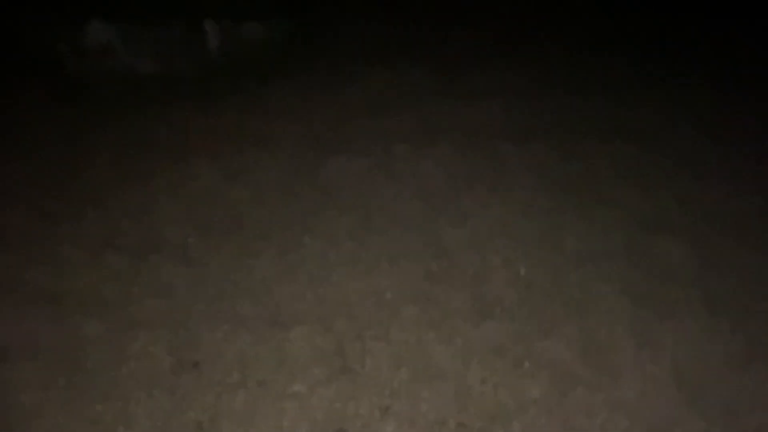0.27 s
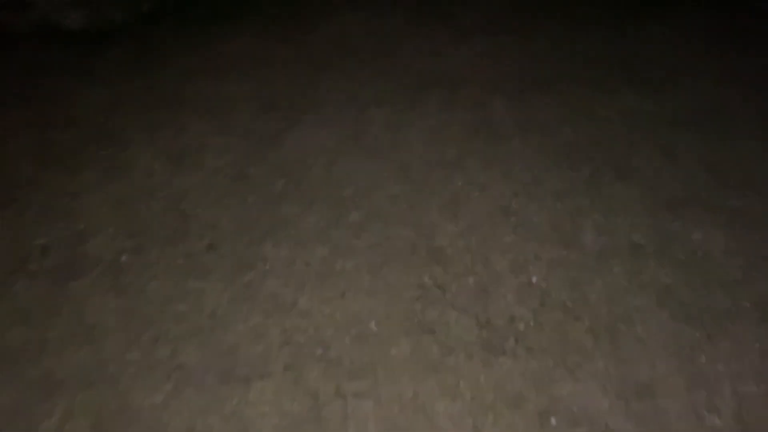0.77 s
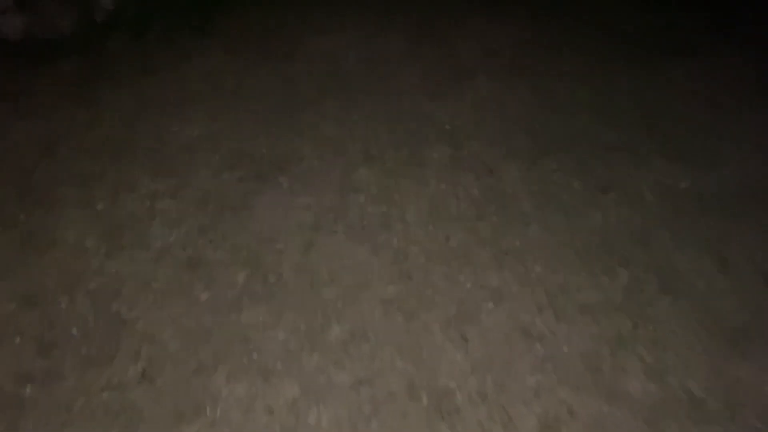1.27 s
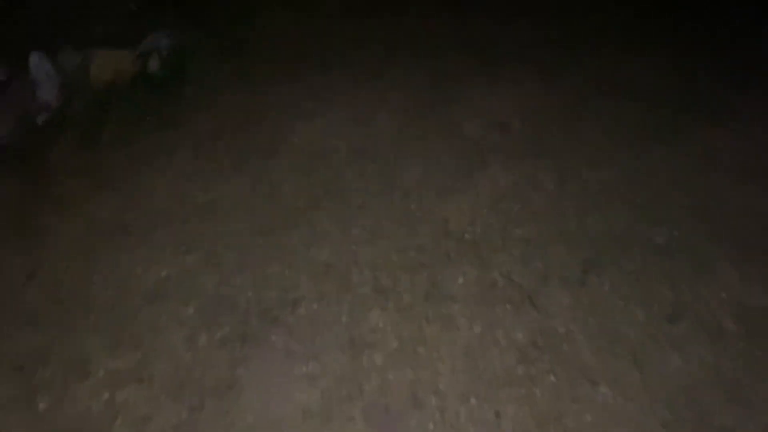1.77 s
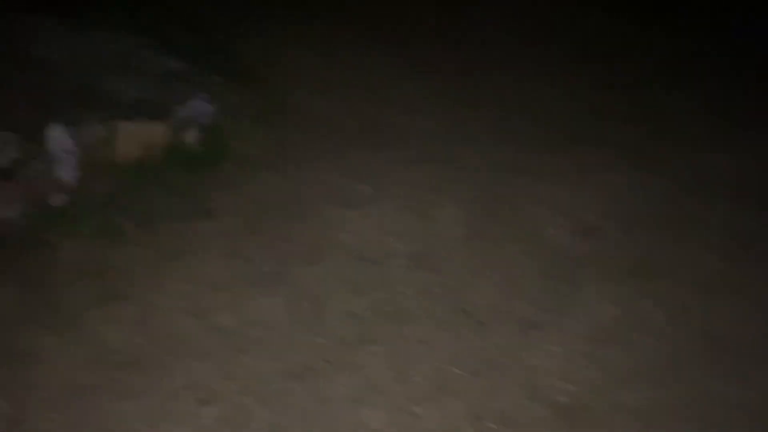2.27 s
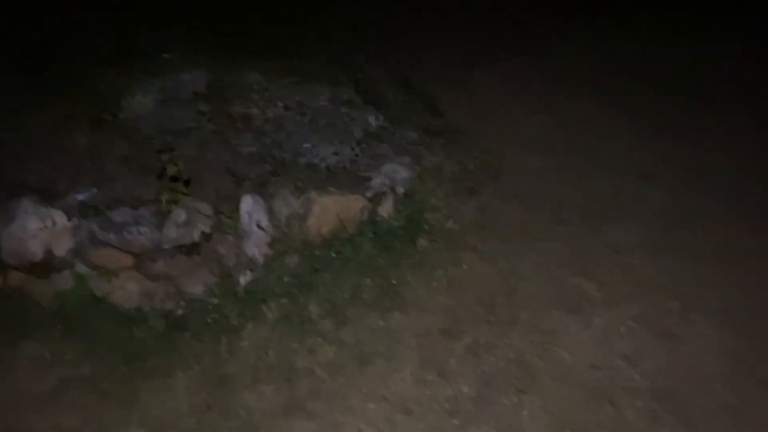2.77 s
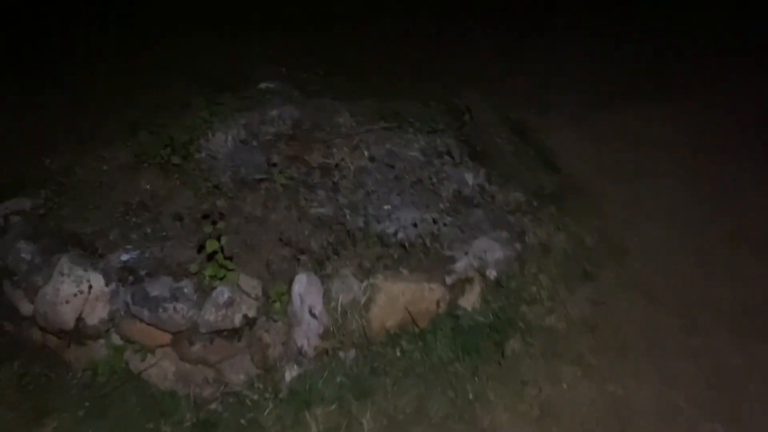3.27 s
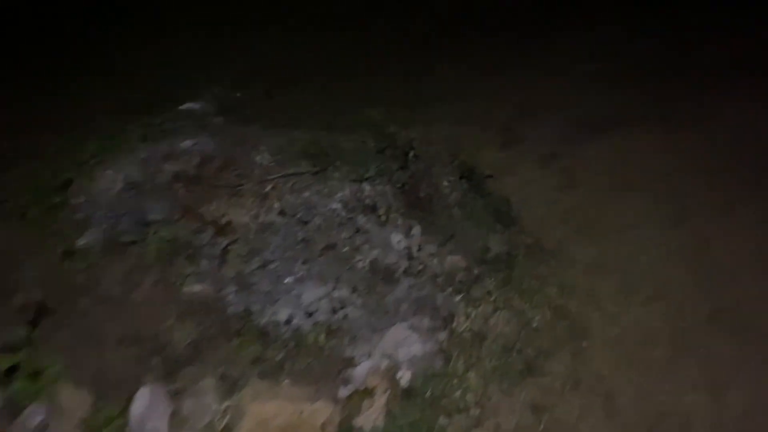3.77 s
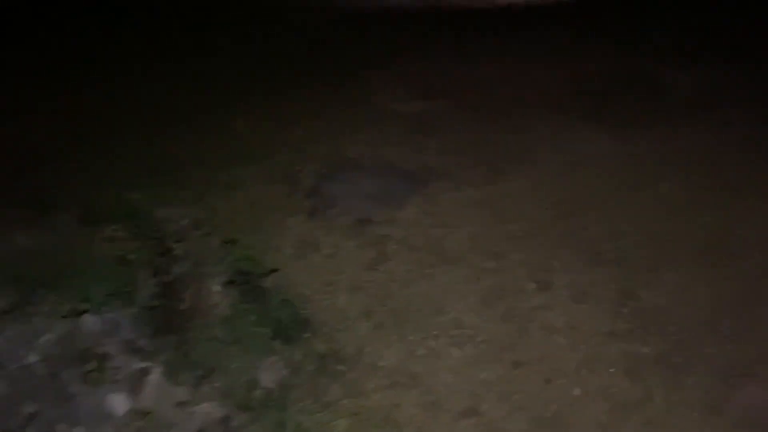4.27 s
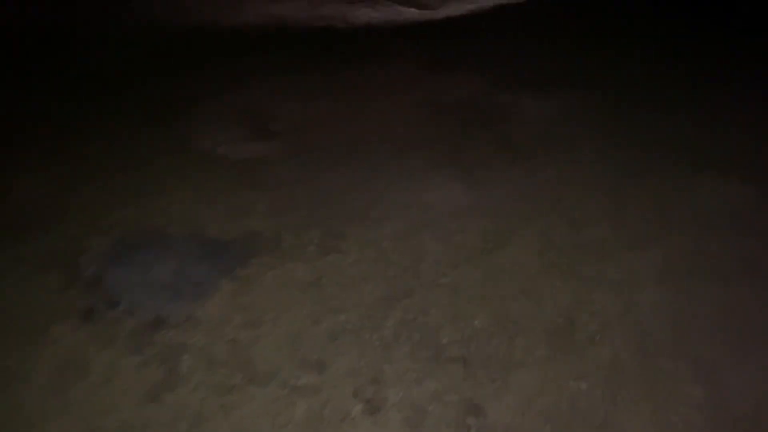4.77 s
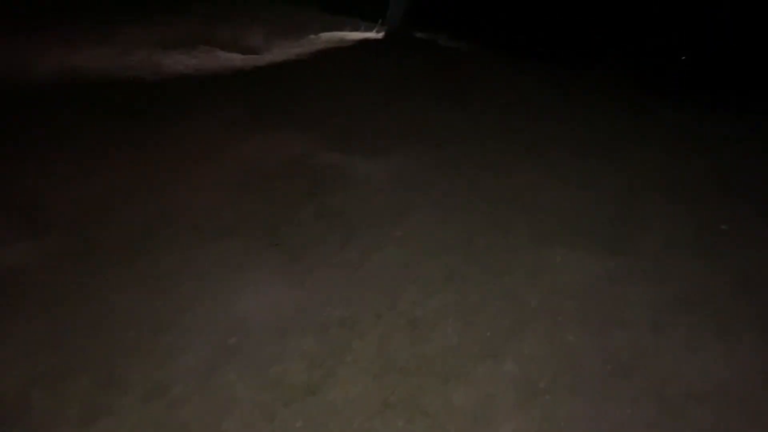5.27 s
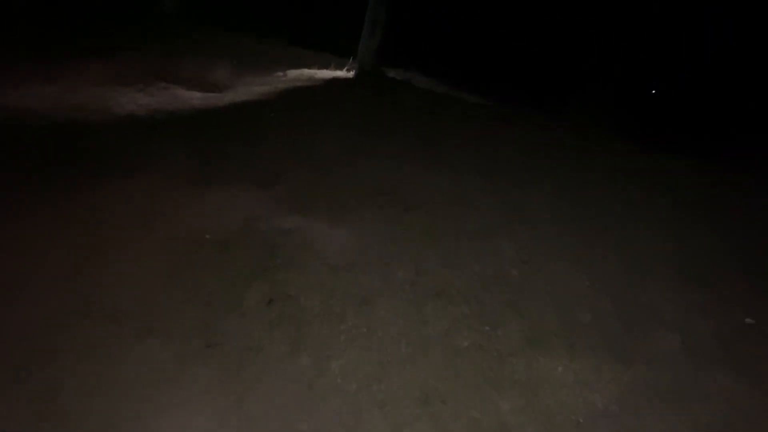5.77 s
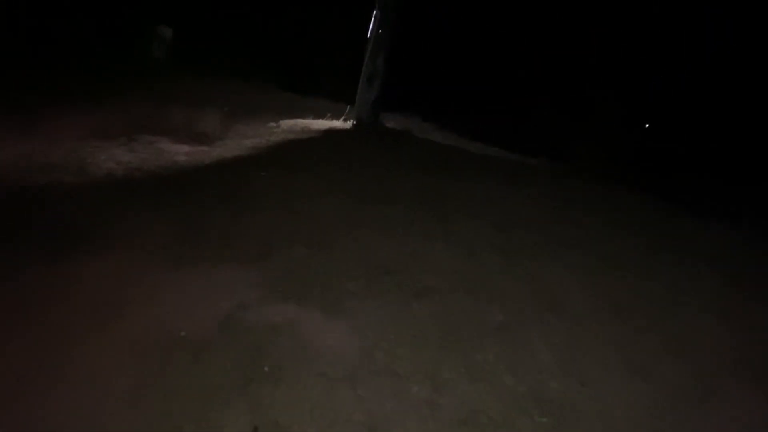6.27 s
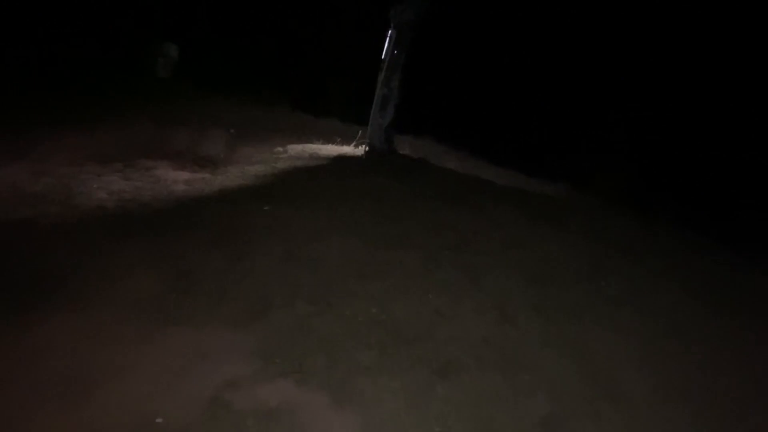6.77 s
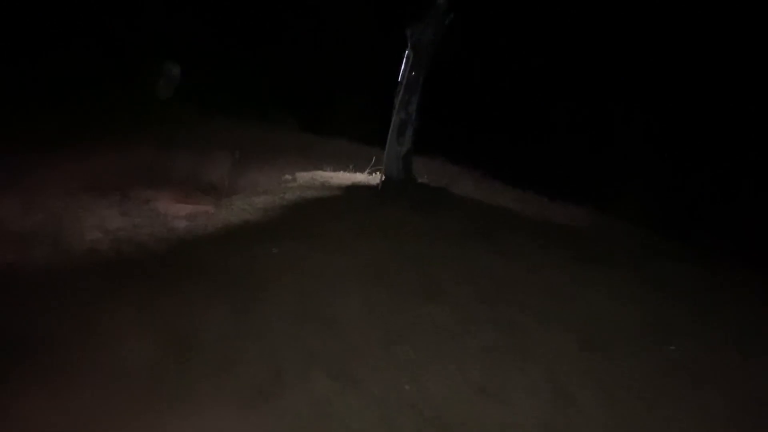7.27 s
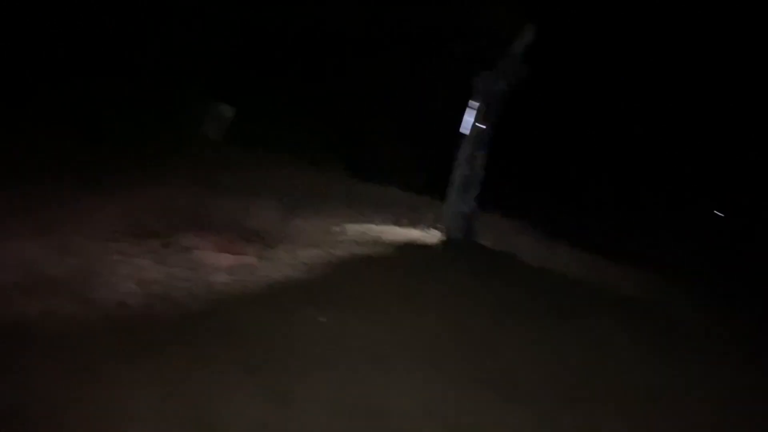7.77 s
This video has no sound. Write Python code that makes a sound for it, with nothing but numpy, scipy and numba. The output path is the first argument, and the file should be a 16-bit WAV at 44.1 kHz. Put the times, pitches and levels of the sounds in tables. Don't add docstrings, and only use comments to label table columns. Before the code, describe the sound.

Handheld stereo microphone on a walker in open night air: unhurried footsteps, roughly two a second, crunch dry grass, drag through soil and softly shake the ground. Twigs tick and pop between steps. A high, raspy katydid pulses constantly, faintest just before the middle and strongest later. A deep thud stands out around five seconds; distant insects make a thin hiss with a faint cricket throb.

```python
import sys
import numpy as np
from scipy import signal
from scipy.fft import rfft, irfft
from scipy.io import wavfile
from scipy.ndimage import uniform_filter1d
from numba import njit

SR = 44100
rng = np.random.default_rng(int(sys.argv[2]) if len(sys.argv) > 2 else 0)


def gain_from_db(level_db):
    decades = np.asarray(level_db, float) / 20
    return 10 ** decades


def output_pcm(signal):
    pcm = np.clip(np.atleast_2d(signal).T, -1, 1) * 32767
    wavfile.write(sys.argv[1], SR, np.round(pcm).astype(np.int16))


N = 353505
TIME = np.arange(N) / SR


def rms_one(x):
    return x / np.sqrt(np.mean(x ** 2) + 1e-20)


def at_hz(points, hz):
    table_hz, table_db = np.transpose(points)
    return np.interp(np.log(hz), np.log(table_hz), table_db)


def drift(rate):
    r = np.exp(-80 * np.pi * rate / SR)
    draws = rng.standard_normal(N // 40 + 2002)
    slow = signal.lfilter([1], [1, -2 * r, r * r], draws)[2000:]
    return np.interp(np.arange(N) / 40, np.arange(len(slow)), rms_one(slow))


def noise_pair():
    return rng.standard_normal((2, N))


def grains(per_s, spread_db):
    spread = spread_db * np.minimum(rng.exponential(1, (2, N)), 5)
    size = gain_from_db(spread) * rng.standard_normal((2, N))
    struck = rng.random(N) < per_s / SR
    return rms_one(size * struck + 1e-9)


# frequency in Hz, left-right likeness from 0 to 1.
PORT_LIKENESS = [(60, .88), (250, .7), (700, .7), (2300, .45), (4000, .5), (6500, .75), (8500, .95),
                 (15000, .97)]


def colour(pair, spectrum, sharing=1):
    hz = np.fft.rfftfreq(N, 1 / SR) + 1
    lowest, highest = spectrum[0][0], spectrum[-1][0]
    skirt = np.clip(hz / lowest, 0, 1) ** 3 * np.clip(highest / hz, 0, 1) ** 3
    alike = np.clip(sharing * at_hz(PORT_LIKENESS, hz), 0, 1)
    mid, side = rfft(pair) * gain_from_db(at_hz(spectrum, hz)) * skirt
    return rms_one(irfft(np.sqrt(1 + alike) * mid + np.sqrt(1 - alike) * side * [[1], [-1]], N))


@njit
def resonate(x, turn, r):
    y = np.zeros(len(x))
    for i in range(2, len(x)):
        drive = (1 - r * r) / 2 * (x[i] - x[i - 2])
        y[i] = drive + 2 * r * np.cos(turn[i]) * y[i - 1] - r * r * y[i - 2]
    return y


def mode(x, hz, width_hz):
    return resonate(x, 2 * np.pi * hz / SR * np.ones(N), np.exp(-np.pi * width_hz / SR))


def double_mode(x, hz, width_hz):
    return mode(mode(x, hz, width_hz), hz, width_hz)


# time in seconds, chirp level in dB,
# facing as a lift of the high wing modes in dB, lateness in ms.
APPROACH = [(0.0, -35, 5, 1), (0.45, -41, 2, 0), (1.25, -40, -2.5, -5), (1.45, -36, -4.5, -5.5),
            (2.0, -34.5, 1, -3), (2.25, -33, 3, -5.5), (2.95, -36.5, -1.5, -0.5), (3.1, -45.5, -7.5, -1),
            (3.7, -47, -3.5, -0.5), (3.9, -40.5, -4.5, 2), (4.15, -37.5, -4.5, 0), (4.45, -33.5, 1.5, 5.5),
            (5.0, -32, 4, 7.5), (5.702, -30, 0, 5), (6.55, -28, 0.5, 5), (6.95, -30, -1, 3.5),
            (7.7, -29, 4, 4), (8.0, -32, 0, -1)]
# time in ms, level in dB, gap in ms, second stroke in dB, facing in dB.
CHIRP_CHANCE = (1.2, .25, 1.0, .8, 1.0)
FIRST_CHIRP_S, CHIRP_EVERY_S, CHIRP_COUNT = 0.0795, 0.11948, 67


def chirps():
    beat_s = FIRST_CHIRP_S + CHIRP_EVERY_S * np.arange(CHIRP_COUNT)
    at_s, *place = np.transpose(APPROACH)
    level_db, facing_db, late_ms = [np.interp(beat_s, at_s, column) for column in place]
    gap_ms = 17.8 - 0.14 * (level_db + 39)
    second_db = 1 + 0.42 * facing_db
    rows = np.transpose([late_ms, level_db, gap_ms, second_db, facing_db])
    rows = rows + CHIRP_CHANCE * rng.standard_normal((CHIRP_COUNT, 5))
    return np.column_stack([beat_s + rows[:, 0] / 1000, rows[:, 1:]])


# time from the top in ms, tooth force in dB, wing pitch in Hz.
FIRST_STROKE = [
    (-37, -65, 6900),
    (-30.5, -18, 5800),
    (-38, -17, 4800),
    (-21, -26.5, 5900),
    (-15, -9, 6280),
    (-6, -3, 6744),
    (1.5, -4, 6700),
    (3.5, -10.5, 13000),
    (9, -8.5, 3600),
]
SECOND_STROKE = [
    (-9, -27, 6300),
    (-2.5, -3, 6900),
    (1.5, -0.5, 7675),
    (2.5, -5.5, 7900),
    (2, -28, 7700),
    (15, -33, 22000),
]
# share of the wing pitch, width in Hz, level in dB,
# extra dB per dB of nearness.
BENDING_MODES = [(1.0, 450, 2.5, 0.05), (1.12, 800, -5, .1), (1.27, 1000, -14, -.3), (.7, 700, -19, .4),
                 (.84, 800, -14, .3)]
# frequency in Hz, width in Hz, level in dB, extra dB per dB of nearness.
STAYING_MODES = [(7605, 700, -8.5, 1.43), (10940, 1800, -16.5, -.5), (12600, 2150, -17, -0.5),
                 (15300, 2200, -16, -.5)]
# frequency in Hz, width in Hz, level in dB, extra dB per dB of nearness.
WING_MIRROR = (8098, 600, -7.5, .5)
TEETH_PER_S = 5000
EVENNESS = 0.9


def katydid(song_rows, echo_db):
    force, pitch = np.zeros(N), np.full(N, 5800.)
    high_db, near_db = np.zeros(N), np.zeros(N)
    for s, level_db, gap_ms, second_db, facing_db in song_rows:
        first = (FIRST_STROKE, s, level_db)
        second = (SECOND_STROKE, s + gap_ms / 1000, level_db + second_db)
        for stroke, top_s, db in (first, second):
            ms, force_db, hz = np.transpose(stroke)
            span = slice(max(round((top_s + ms[0] / 1000) * SR), 0), round((top_s + ms[-1] / 1000) * SR))
            now_ms = (TIME[span] - top_s) * 1000
            force[span] = np.maximum(force[span], gain_from_db(db + np.interp(now_ms, ms, force_db)))
            pitch[span] = np.interp(now_ms, ms, hz)
            high_db[span] = 0.5 * facing_db
            near_db[span] = level_db + 37.5
    force = uniform_filter1d(force, size=60)
    pitch = uniform_filter1d(pitch, size=200)

    modes = []
    for share, width, db, slope in BENDING_MODES:
        modes.append((share * pitch, width, db + np.sign(share - 1.07) * high_db, slope))
    for hz, width, db, slope in STAYING_MODES:
        beaming_db = 0.81 * (hz > 9000) * high_db
        modes.append((hz, width, db + beaming_db, slope))
    song = np.zeros(N)
    for hz, width, db, slope in modes:
        teeth = grains(TEETH_PER_S, spread_db=-1.14)[0]
        ringing = double_mode(teeth, hz, width)
        swing = uniform_filter1d(ringing ** 2, size=400) / np.mean(ringing ** 2) + 0.15
        song += ringing * swing ** (-EVENNESS / 2) * force * gain_from_db(db + slope * near_db + 16.0)

    hz, width, db, slope = WING_MIRROR
    touch = np.abs(force / gain_from_db(near_db - 30.5)) ** 0.28
    touch = touch * gain_from_db(db + (1 + slope) * near_db + high_db - 24.0)
    song += double_mode(grains(TEETH_PER_S, spread_db=-2.0)[0], hz, width) * touch

    leaves = rng.standard_normal((2, 4, SR // 4)) * gain_from_db(-60 * TIME[:SR // 4] / 0.13)
    leaves = leaves / np.sqrt(np.sum(leaves[0, 0] ** 2))
    place = np.searchsorted(song_rows[:, 0] + 0.05, TIME) % 4
    parts = song * (place == np.arange(4)[:, None])
    echoes = signal.oaconvolve(parts[None], leaves, axes=2).sum(axis=1)[:, :N]
    mid, side = echoes * gain_from_db(echo_db)
    return song * gain_from_db([[1.1], [-1.1]]) + mid + 0.2 * side * [[1], [-1]]


def swells(events, shapes):
    powers = np.zeros((3, N))
    for s, *levels in events:
        span = slice(max(round((s - 0.5) * SR), 0), round((s + 1) * SR))
        for power, db, (delay_s, rise_s, fall_s) in zip(powers, levels, shapes):
            t = TIME[span] - s - delay_s
            envelope = np.exp(2 * np.minimum(t / max(rise_s, 0.005), -t / max(fall_s, 0.005)))
            power[span] += gain_from_db(2 * db) * envelope
    return powers


# time in seconds, grass crunch in dB, soil scuff in dB, ground rumble in dB.
STEPS = [(0.23, -44, -51, -47.5), (0.8, -46, -54.5, -62), (0.96, -45, -49, -50.5), (1.365, -44, -53, -50),
         (1.94, -47, -60, -48.5), (2.49, -49.5, -51.5, -51), (2.94, -53.5, -71, -56),
         (3.73, -39.5, -48.5, -45), (4.29, -52.5, -56, -50), (4.85, -45, -52.5, -43),
         (5.4, -46.5, -46, -46), (5.93, -45.5, -52.5, -47.5), (6.47, -50, -53, -55),
         (7.11, -48.5, -61.5, -46), (7.73, -45.5, -49.5, -43.5)]
# time in seconds, grass crunch, soil scuff and ground rumble in dB.
DRAGS = [(0.5, -55, -50.5, -58), (0.68, -46, -53.5, -71), (1.06, -73, -47.5, -60), (1.6, -64, -49, -49),
         (1.83, -46.5, -71, -76), (2.22, -54, -46, -56), (2.72, -66, -48.5, -51), (3.1, -49, -63, -52),
         (3.29, -52, -48, -48), (3.44, -53, -45.5, -42), (3.58, -53, -60, -67), (4.01, -69, -52.5, -56),
         (4.15, -52, -52, -46), (4.4, -51.5, -50, -57), (4.55, -72, -49.5, -49), (5.0, -53, -51, -48),
         (5.11, -53, -53, -59), (5.24, -52, -51.5, -50), (5.53, -52.5, -59, -60), (5.66, -72, -69, -46),
         (6.1, -79, -51.5, -50), (6.28, -81, -55, -52), (6.7, -51.5, -48, -50), (6.83, -69, -52.5, -71),
         (7.29, -66, -46.5, -54), (7.5, -70, -56.5, -52.5), (7.93, -74, -74, -54)]
# delay, rise and fall in seconds.
STEP_SHAPE = [(0, 0.025, 0.096), (.0, 0.027, 0.24), (0.069, 0.1, 0.17)]
# delay, rise and fall in seconds.
DRAG_SHAPE = [(0, 0.05, 0.037), (0, 0.087, 0.054), (0, .07, .06)]
# crunch, scuff and rumble in dB.
BETWEEN_STEPS_DB = (-63, -64, -56)
# frequency in Hz, level in dB per Hz.
CRUNCH_TONE = [(700, -3), (1200, 4.5), (2000, 5), (3200, -1), (5000, -5.5), (9000, -32.5), (15000, -14)]
# frequency in Hz, level in dB per Hz.
SCUFF_TONE = [(150, 2), (300, 2), (650, 0.5), (1000, -3), (1600, -14)]
# frequency in Hz, level in dB per Hz.
RUMBLE_TONE = [(15, -42), (25, -6), (43, -10), (59, 0), (129, -8.5), (250, -21), (320, -45), (550, -120)]


def walking():
    power = swells(STEPS, STEP_SHAPE) + swells(DRAGS, DRAG_SHAPE)
    power = power + gain_from_db(2 * np.array(BETWEEN_STEPS_DB))[:, None]
    crunch_gain, scuff_gain, rumble_gain = np.sqrt(power)
    rumble_clumps, scuff_clumps, crunch_clumps = [gain_from_db(1.2 * drift(rate)) for rate in (10, 25, 30)]
    rumble = rumble_gain * rumble_clumps * colour(noise_pair(), RUMBLE_TONE)
    scuff = scuff_gain * scuff_clumps * colour(grains(1500, spread_db=2.0), SCUFF_TONE)
    crunch = crunch_gain * crunch_clumps * colour(grains(2000, spread_db=0.5), CRUNCH_TONE)
    return rumble + scuff + crunch


# time in seconds, peak in dB.
STEM_SNAPS = [(0.192, -33), (0.9797, -56), (1.3557, -42), (1.3604, -34), (1.9473, -41), (2.0146, -35),
              (2.0298, -41), (2.4722, -35), (3.7377, -56), (4.242, -36), (5.403, -34.5), (5.936, -36),
              (7.7404, -36)]


def snaps():
    clicks = np.zeros(N)
    for s, db in STEM_SNAPS:
        clicks[round(s * SR)] = gain_from_db(db + 16)
    return mode(clicks, 3400, 3700) + gain_from_db(7.5) * mode(clicks, 1500, 1800)


def glide(s, peak_db, hz, rise_s, fall):
    t = np.clip(TIME - s, 0, 12 * rise_s) / rise_s
    phase = 2 * np.pi * hz * rise_s * (t + fall * (1 - np.exp(-t)))
    return gain_from_db(peak_db) * t * np.exp(1 - t) * np.sin(phase) * (t < 12)


# time in seconds, peak in dB, frequency in Hz, left-right balance in dB.
TWIG_POPS = [(0.49, -38, 440, -4), (0.678, -30, 665, -3), (1.065, -24, 700, 1), (1.656, -38, 440, -3),
             (1.767, -24, 940, -7.5), (1.947, -24, 2000, 2), (2.306, -33, 566, 4), (2.474, -37, 2580, -3.5),
             (2.488, -41, 298, 0), (2.559, -28.5, 2000, 7), (3.173, -36.5, 325, 3), (3.366, -28, 574, -3),
             (3.401, -31, 1200, -1.0), (3.422, -25.5, 590, -6), (3.995, -50.5, 880, 0.5),
             (4.013, -29.5, 950, -13), (4.501, -39, 370, 1), (4.555, -18.5, 655, -1),
             (5.233, -27.5, 960, -8), (5.388, -27.5, 940, 2.0), (5.626, -44, 694, 2.5),
             (5.663, -26, 550, 2), (5.934, -43, 2420, 7), (6.251, -30, 1160, 0.5), (6.823, -18, 714, 1.5),
             (7.281, -30, 553, -2), (7.739, -24, 1480, 2), (7.792, -32, 902, -1), (7.913, -38, 590, 2)]
# time in seconds, peak in dB, frequency in Hz,
# rise in ms, downward glide as a share of the frequency.
HEEL_THUDS = [(0.331, -39, 60.6, 14, 0.13), (1.469, -42, 53.7, 22, .1), (2.59, -37, 52.5, 10, 0.17),
              (3.45, -37, 57.7, 12, 0.09), (3.763, -32, 64, 8.3, 0.17), (3.934, -34.5, 56.7, 23, .1),
              (4.045, -34.5, 58, 10.4, 0.091), (4.271, -34.5, 53, 19, 0.083), (4.961, -17, 47, 10.7, 1.6),
              (5.45, -30.5, 49, 18, 0.13), (7.75, -37, 55, 12, 0.18)]


def knocks():
    out = np.zeros((2, N))
    for s, db, hz, pan_db in TWIG_POPS:
        pop = glide(s, db - 2.0, 0.85 * hz, 0.44 / hz, 0.99)
        out += pop * gain_from_db([[pan_db / 2], [-pan_db / 2]])
    for s, db, hz, rise_ms, fall in HEEL_THUDS:
        out += glide(s, db, hz, rise_ms / 1000, fall)
    return out


# frequency in Hz, level in dB per Hz.
FAR_HISS_TONE = [(4000, -8), (5600, -25), (6500, 4), (7500, 6), (8500, -2.5), (9600, 0.5), (11000, -10),
                 (13000, -9), (15500, -7.5)]
# frequency in Hz, width in Hz, pulses per second, level in dB,
# loudest time in seconds, duration in seconds.
FAINT_CRICKETS = [
    (2290, 320, 8.4, -54.5, 7.2, 2.9),
]


def far_insects(hiss_db):
    out = gain_from_db(hiss_db + 1.0 + 1.65 * drift(9.9)) * colour(noise_pair(), FAR_HISS_TONE)
    for hz, width, per_s, db, at_s, lasting_s in FAINT_CRICKETS:
        pulses = (0.5 + 0.5 * np.cos(2 * np.pi * per_s * TIME)) ** 2
        presence = np.exp(-0.5 * ((TIME - at_s) / lasting_s) ** 2)
        tone = np.array([rms_one(double_mode(noise, hz, width)) for noise in noise_pair()])
        out += gain_from_db(db) * pulses * presence * tone
    return out


# frequency in Hz, level in dB per Hz.
NIGHT_TONE = [(24, -49), (40, -64), (80, -1.5), (446, -8.5), (1600, -11), (2290, -7.5), (3410, -16),
              (5400, -12), (6000, -3), (7800, -76), (13200, -120)]


def night_air():
    return gain_from_db(-52) * colour(noise_pair(), NIGHT_TONE, sharing=0.38)


def scene():
    at_s, level_db = np.transpose(APPROACH)[:2]
    near_db = np.interp(TIME, at_s, level_db) + 34
    singer = katydid(chirps(), echo_db=-3 - 1.07 * near_db)
    chorus = far_insects(hiss_db=-47 + 0.3 * near_db)
    return singer + walking() + snaps() + knocks() + chorus + night_air()


# frequency in Hz, dB under the stronger.
STEREO_BAR = [(2600, -8), (5000, -7), (5800, -19), (7600, -19), (8400, -6), (11000, -5), (13000, -3.5),
              (16000, -3)]


def joint_stereo(x):
    both = np.pad([x[0] + x[1], x[0] - x[1]], ((0, 0), (144, 0)))
    hz, _, lines = signal.stft(both, SR, "cosine", 2048, 1024)
    line_power = np.abs(lines) ** 2
    band_power = np.add.reduceat(line_power, np.arange(0, len(hz), 16), axis=1) / 16
    power = band_power[:, np.arange(len(hz)) // 16]
    frames = power.shape[2]
    band_hz = hz // 344.5 * 344.5 + 172
    bar_db = at_hz(STEREO_BAR, band_hz)[:, None] + rng.normal(0, 2.2, frames)
    bar_db = bar_db - 30 * (rng.random(frames) < 0.05)
    keep = power > gain_from_db(2 * bar_db) * power[::-1]
    keep = keep & (line_power > gain_from_db(2 * -7) * power.max(axis=0))
    keep = (keep | (hz < 1400)[:, None]) & (hz < 15830)[:, None]
    mid, side = signal.istft(lines * keep, SR, "cosine", 2048, 1024)[1][:, 144:N + 144]
    return np.array([mid + side, mid - side]) / 2


# frequency in Hz, radians by which left leads.
PORT_PHASE = [(100, 0), (4800, .5), (6200, -.9), (7000, -.3), (7300, -.5), (9080, -np.pi),
              (11150, -2 * np.pi), (13150, -3 * np.pi), (15300, -4 * np.pi), (19600, -6 * np.pi)]
# frequency in Hz, left-right balance in dB.
PORT_BALANCE = [(80, 1), (300, 2.5), (700, 4), (1300, -1.8), (3000, 2), (9000, -1.5)]


def top_cut(x):
    return signal.sosfilt(signal.butter(12, 16470, fs=SR, output="sos"), x)


def record(dry):
    hz = np.fft.rfftfreq(N, 1 / SR) + 1
    lead = np.interp(hz, *np.transpose(PORT_PHASE))
    tilt = gain_from_db(at_hz(PORT_BALANCE, hz) / 2 * [[1], [-1]])
    ports = irfft(rfft(dry) * tilt * np.exp(0.5j * lead * [[1], [-1]]), N)
    mix = joint_stereo(ports)
    return top_cut(mix)


dry = scene()
out = record(dry)
output_pcm(out)
```